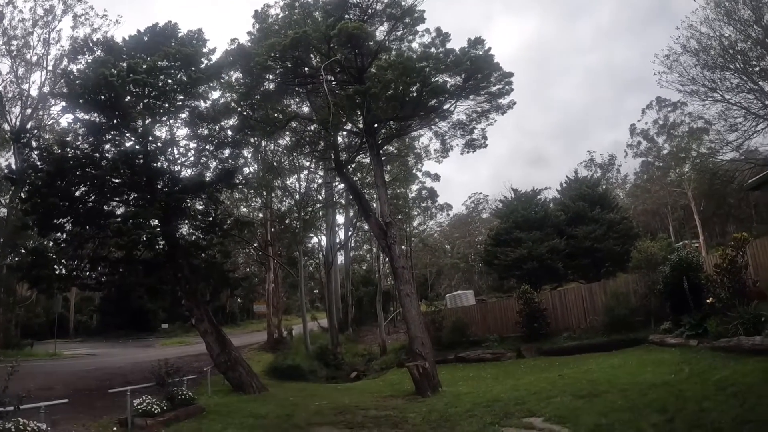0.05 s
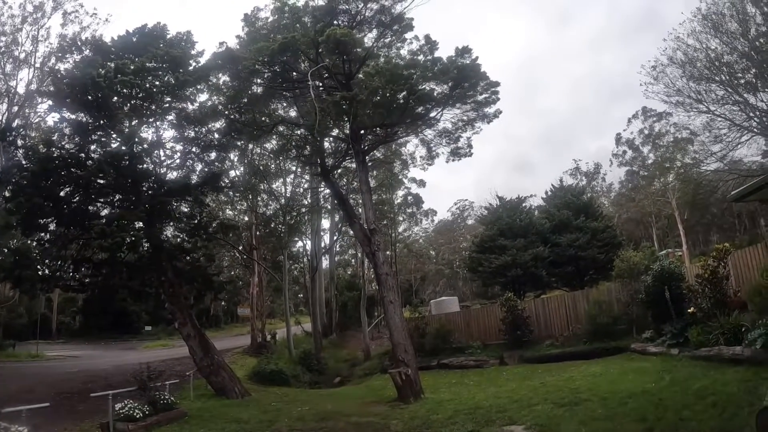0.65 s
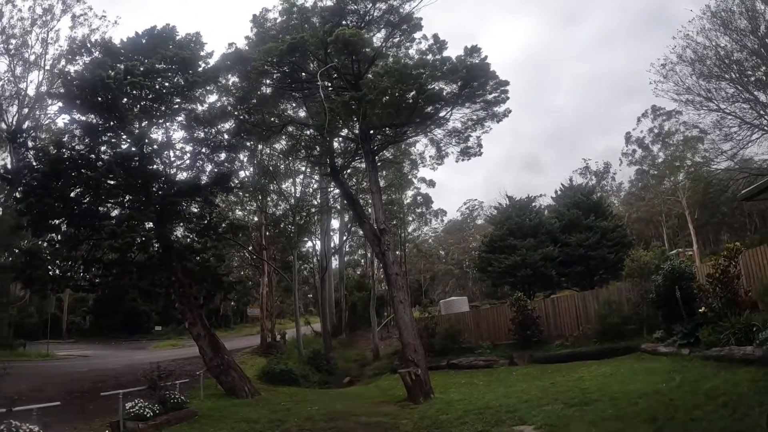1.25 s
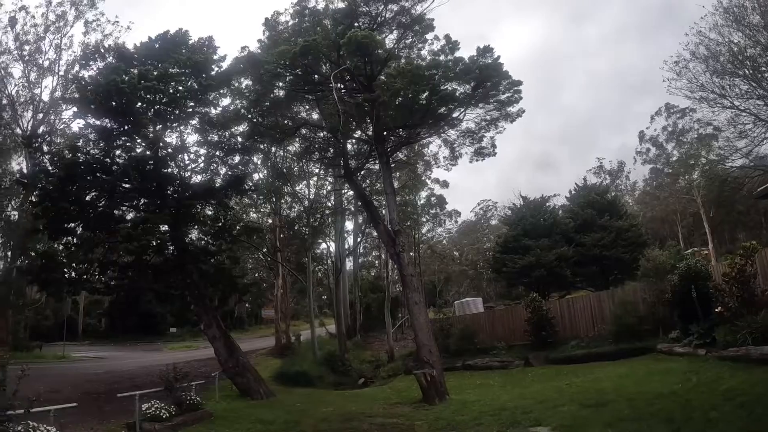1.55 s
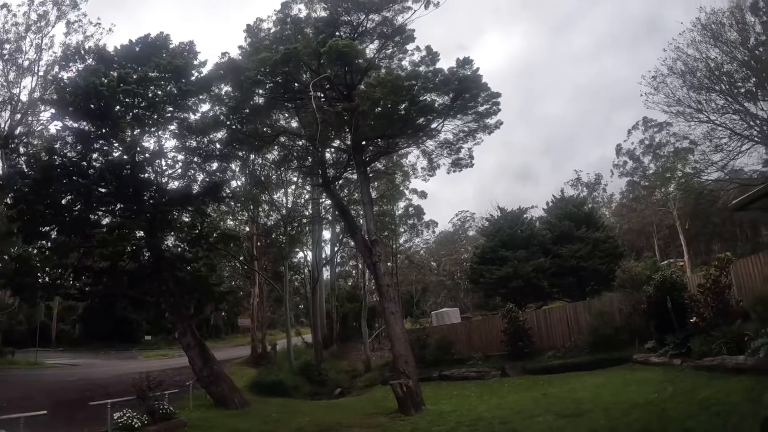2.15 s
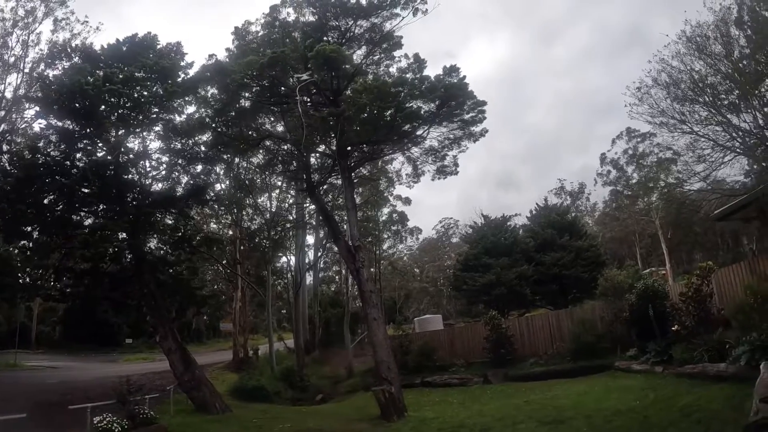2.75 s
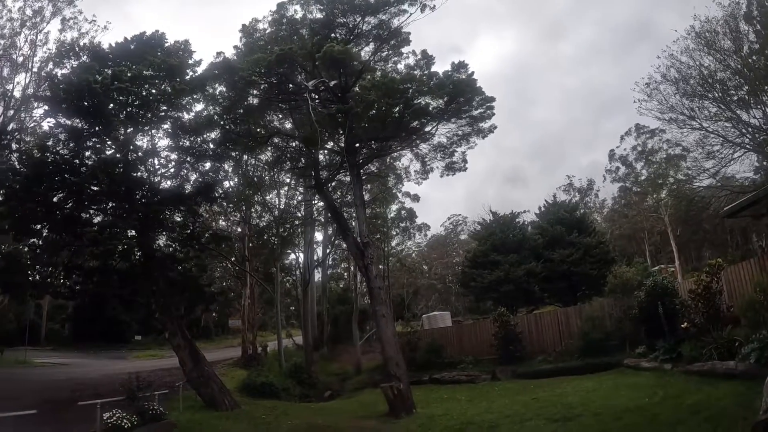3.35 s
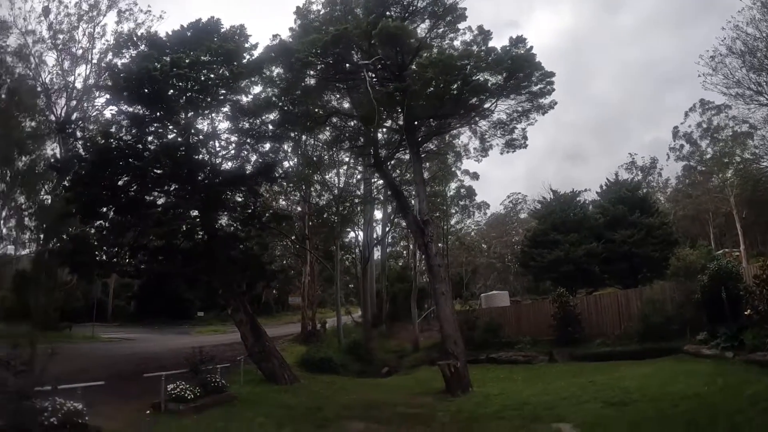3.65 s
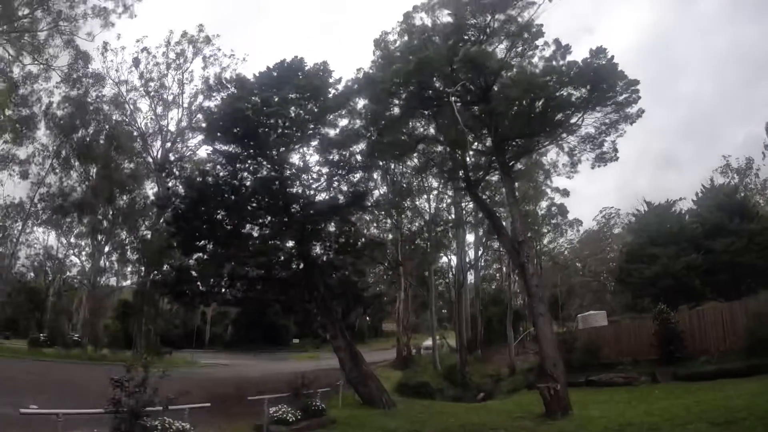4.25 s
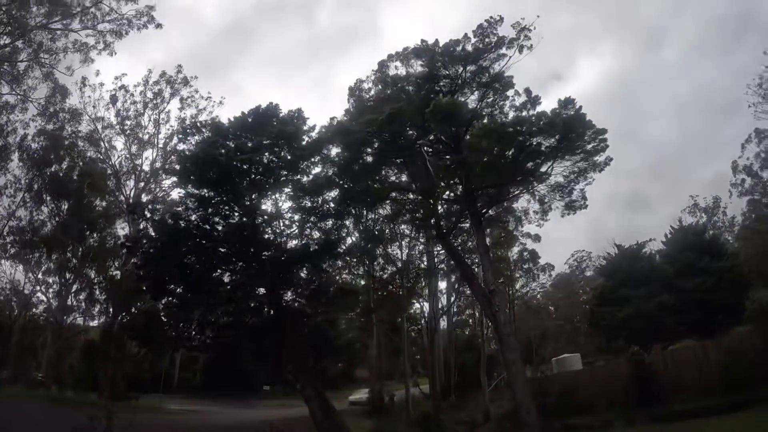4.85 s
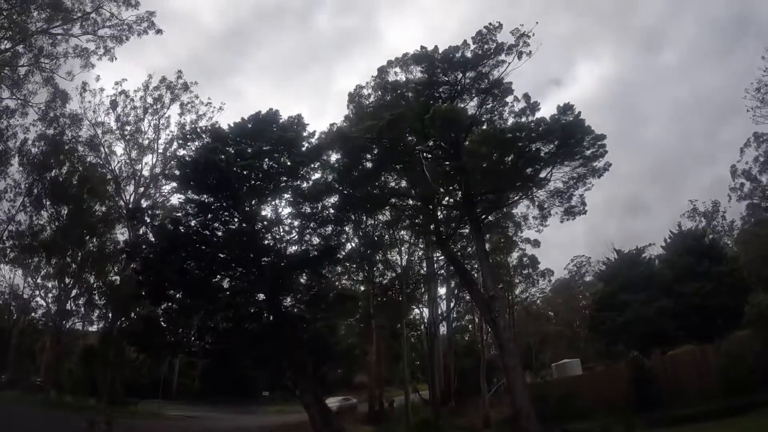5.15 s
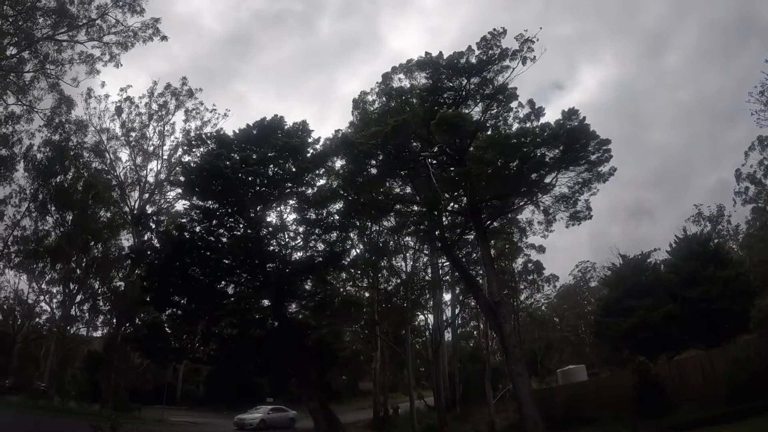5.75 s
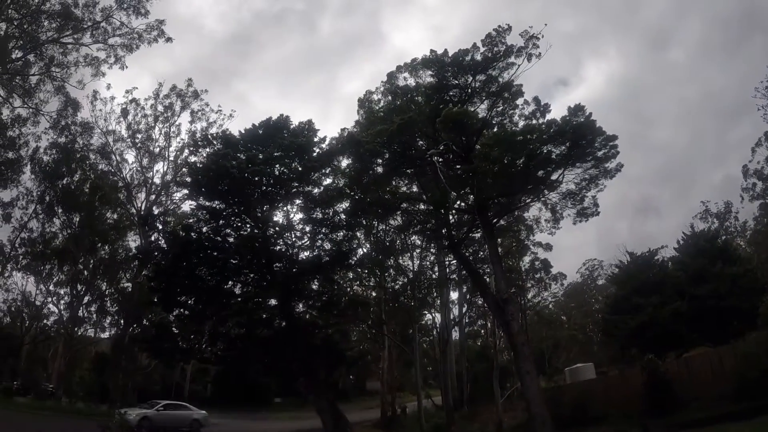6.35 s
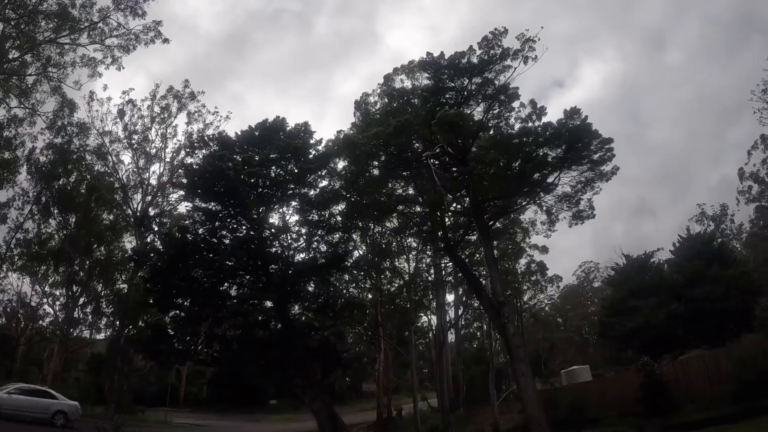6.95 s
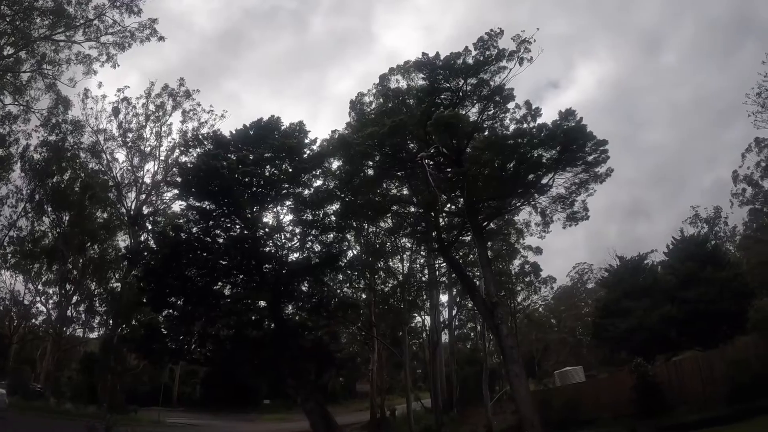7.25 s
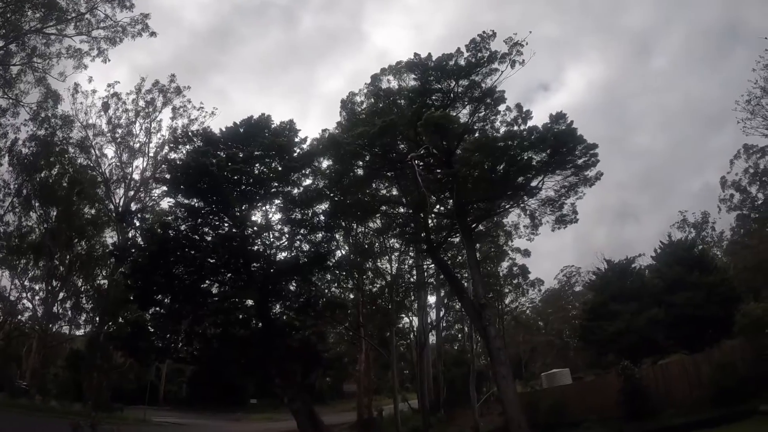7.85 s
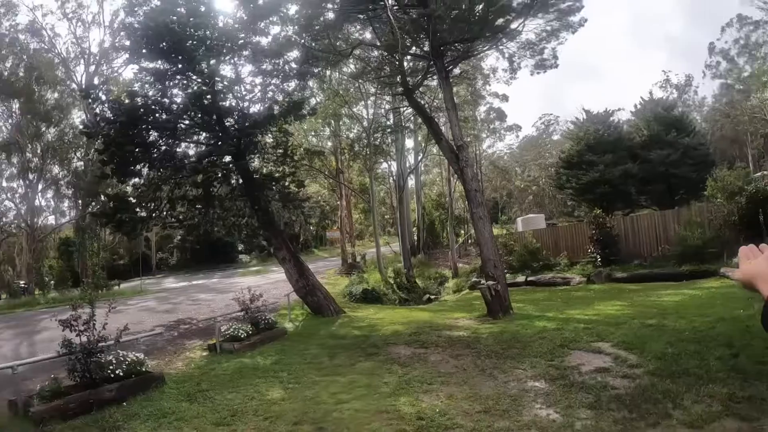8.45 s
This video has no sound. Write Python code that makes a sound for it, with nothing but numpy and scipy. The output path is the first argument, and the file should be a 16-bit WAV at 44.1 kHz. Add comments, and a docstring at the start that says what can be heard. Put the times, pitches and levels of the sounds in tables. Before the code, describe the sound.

Large birds, probably cockatoos, call among tall garden trees: three loud, high wailing whistles at about 0, 1.1 and 2 seconds, each lasting under a second, partly rasping and ending in a sharp downward flick. A smaller bird adds thin, tumbling whistles in pairs near 2.3 and 6 seconds. Distant birds give hoarse notes around 3 seconds, a descending warble at 4.4 and fluting notes afterwards. A far crow caws at 5.4, 6.3 and 7.3 seconds, and a softer, raspier wail comes at 6.1. Underneath, a low hum repeatedly swells in steady outdoor air. A slow car rumbles from about 3.9 seconds, its engine strongest near 6.8. A brief low buffet hits the microphone at 7.4. Quick scratchy chirps run from 7.8 to 8.5. Everything dips out momentarily at 3.8 and 7.6 seconds, and the background returns with a different tone.

```python
"""Long wailing whistles break into a rasp and end in a downward flick: large birds, probably cockatoos,
among tall garden trees. A vibrating membrane makes each tone and a slower one modulates it into a rasp.
A smaller bird adds high stepped whistles; far birds flute, warble and caw, and at last a small bird
chirps. Trunks scatter every call. Beneath them a low hum swells and a car rolls by. Twice the whole
sound dips out briefly, and the outdoor air comes back with another colour."""
import sys
import numpy as np
from scipy import signal
from scipy.fft import rfft, irfft, next_fast_len
from scipy.io import wavfile
from scipy.ndimage import uniform_filter1d

SR = 44100
rng = np.random.default_rng(int(sys.argv[2]) if len(sys.argv) > 2 else 0)


def persist_wave(psi):
    """Save psi, clipped to +-1, as 16-bit WAV."""
    counts = np.round(np.clip(psi, -1, 1) * 32767).astype(np.int16)
    wavfile.write(sys.argv[1], SR, np.atleast_2d(counts).T)


N = 374409


def wails(flutter_depth=0.76, rush_db=-1.5, flick_clear_s=.015, slap_s=.048, slap_db=-16):
    """Amplitude modulation: a slow membrane shakes a whistling one into sidebands as air rushes past."""
    # One course per wail, up to its flick. Each row: time in seconds, membrane pitch in Hz,
    # level in dB, rasp from 0 to 1, flutter rate in Hz.
    courses = [
        [(-.05, 2380, -23, 0.97, 1130), (.07, 2320, -30.5, 1, 1134), (.13, 2225, -31, 0.95, 1150),
         (.19, 2195, -25.5, 0.62, 1153), (.45, 2150, -26.5, .65, 1201), (.52, 2100, -24.5, 0.13, 1406),
         (.578, 2083, -22.5, 0.2, 1504), (.598, 2086, -17, 0.19, 1535), (.69, 2114, -25, 0.56, 1595),
         (.809, 2088, -24, 0.66, 1802)],
        [(1.06, 1990, -46, .8, 957), (1.085, 2067, -31.5, 0.75, 1000), (1.11, 2170, -27.5, 0.65, 1075),
         (1.16, 2298, -26.5, 0.3, 1064), (1.23, 2376, -24, 0, 1070), (1.42, 2366, -20.5, 0, 1090),
         (1.55, 2306, -22, 0, 1090), (1.63, 2275, -20.5, 0, 1087), (1.675, 2215, -24, 0, 1070),
         (1.69, 2170, -19, 0.05, 1102), (1.735, 2100, -21, 0, 1090), (1.756, 2080, -24, 0.3, 1080)],
        [(2.04, 1880, -50, 0.7, 953), (2.075, 2050, -37.5, 0.86, 1000), (2.105, 2265, -34.5, 0.9, 1152),
         (2.145, 2570, -31.5, 0.6, 1100), (2.19, 2765, -27, 0.28, 1100), (2.28, 2710, -23, 0.05, 1110),
         (2.40, 2637, -21.5, 0.15, 1100), (2.48, 2544, -27, 0.06, 1086), (2.58, 2391, -20.5, 0.1, 1110),
         (2.68, 2354, -23.5, 0.03, 1100), (2.726, 2253, -24, 0.33, 1110)],
        [(6.115, 1966, -38, .7, 892), (6.17, 2035, -33, .7, 900), (6.235, 2148, -29.5, 0.6, 920),
         (6.31, 2200, -35, 0.8, 937), (6.45, 2320, -33, .55, 947), (6.53, 2400, -34, .7, 1046),
         (6.68, 2306, -32, 0.81, 1010), (6.792, 2248, -33.5, .95, 1047)],
    ]
    # The second voice of each wail. Each row: time in seconds, pitch in Hz, level in dB.
    undertones = [
        [(-.05, 2340, -44), (.18, 2220, -42), (.34, 2190, -37.5), (.45, 2110, -40.5), (.54, 2060, -36.5),
         (.63, 2110, -40.5), (.72, 2140, -37), (.82, 2090, -44)],
        [(1.02, 2000, -45), (1.09, 2080, -39), (1.13, 2350, -43), (1.19, 2690, -44), (1.3, 2490, -29.5),
         (1.42, 2390, -34.5), (1.48, 2390, -44), (1.59, 2330, -42), (1.69, 2170, -42), (1.77, 2030, -39)],
        [(2.04, 1800, -43), (2.08, 2100, -39), (2.105, 2300, -43), (2.13, 2620, -41), (2.19, 2680, -47),
         (2.25, 2690, -51), (2.33, 2660, -32), (2.39, 2640, -50), (2.43, 2610, -60), (2.48, 2540, -39),
         (2.56, 2410, -36), (2.67, 2380, -40.5), (2.74, 2170, -40)],
        [(6.42, 2350, -50), (6.62, 2330, -52), (6.81, 2170, -49)],
    ]
    # The timbre of each wail. Each row: pitch jitter and flutter jitter as fractions, harmonics 3 and 4
    # in dB against the second, flick level in dB, reverberation in dB against the direct sound.
    voices = [(0.01125, .1, -29, -16, -17, 0.31), (0.01306, 0.044, -18.5, -29.5, -15.5, -1),
              (0.012, .05, -23, -51, -14.5, 0.74), (0.0284, 0.174, -5.5, -29, -20.5, 2.1)]
    out = np.zeros((2, N))
    for course, under, timbre in zip(courses, undertones, voices):
        jitter, flutter_jitter, third_db, fourth_db, flick_db, wet_db = timbre
        start, on, hz, db, rasp, flutter_hz = wail_gesture(course, flick_db)
        n = len(hz)
        quaver = wander(120, n) * (hz / hz.max()) ** 3  # dies away as the membrane slackens
        phase = turn(hz * (1 + jitter * quaver + 0.0198 * rasp * wander(556, n)))
        since_flick = start + np.arange(n) / SR - course[-1][0]
        held = np.clip(1 - since_flick / flick_clear_s, 0, 1)  # overtones and flutter end in the flick
        overtones = undb(third_db) * np.sin(3 * phase) + undb(fourth_db) * np.sin(4 * phase)
        # the call sounds an octave above the membrane's pitch
        tone = np.sin(2 * phase) + (1 - 0.69 * rasp) * held * overtones
        flutter = held * np.sin(turn(flutter_hz * (1 + flutter_jitter * wander(263, n))))
        voice = np.sqrt(2) * tone * (1 + rasp * flutter_depth * flutter)
        voice += rasp * undb(rush_db) * breath(n)
        track = np.zeros(N)
        add(track, start, voice * on * undb(db))
        add(track, start + slap_s, voice * on * undb(db + slap_db))  # one echo, perhaps off a fence
        add(track, *undertone(under))
        out += trees(track, wet_db=wet_db, t60=0.87, pan_db=-0.2, lag_s=-.0018)
    return out


def wail_gesture(course, flick_db, throb_hz=13.76, throb_db=2.0, waver=0.00302, flick_rasp=.6):
    """Slow random modulation makes a held note throb; an accented downward glide ends it."""
    # The closing flick. Each row: time after the held note in seconds, fraction of its last pitch,
    # level in dB against the flick level.
    flick_shape = [(.011, 1, -7), (.018, .92, 1.5), (.024, .85, -0.5), (.032, .7, -9.5), (.04, .54, -15.5),
                   (.049, .39, -19.5), (.059, 0.28, -39.5)]
    end, last_hz, _, last_rasp, last_flutter = course[-1]
    flick = [(end + s, last_hz * share, flick_db + db, last_rasp * share * flick_rasp, last_flutter)
             for s, share, db in flick_shape]
    start, on, hz, db, rasp, flutter_hz = controls(list(course) + flick)
    n = len(hz)
    held = start + np.arange(n) / SR < end
    hz = hz * (1 + waver * wander(throb_hz, n))
    db = db + throb_db * wander(throb_hz, n) * held
    return start, on, hz, db, np.clip(rasp, 0, 1), flutter_hz


def breath(size):
    """Turbulence: air forced past the membrane adds broadband noise to the rasp."""
    # The spectrum of the rush. Each row: frequency in Hz, relative level in dB.
    rush_colour = [(1500, -29), (2400, -5), (3400, -7.5), (4600, 0.5), (5800, -1.5), (7000, -9),
                   (9500, -18), (15000, -19.5)]
    return noise(rush_colour, size)


def undertone(course, jitter=.012, waver=.006, break_db=3.0):
    """Biphonation: a thin second voice glides about an octave under a wail, wavering and breaking."""
    start, on, hz, db = controls(course)
    n = len(hz)
    phase = turn(hz * (1 + jitter * wander(150, n) + waver * wander(18, n)))
    dips_db = break_db * np.abs(wander(16, n))
    return start, np.sqrt(2) * np.sin(phase) * on * undb(db - dips_db)


def whistles(steady=0.0124, unsteady=0.13):
    """Random frequency modulation roughens a thin whistle more and more as its pitch drops."""
    # High whistles. Each row: start in seconds, length of the arch in seconds, top pitch in Hz,
    # lowest step in Hz, level in dB, loss in dB per unit of fractional pitch drop.
    calls = [(2.261, 0.055, 8090, 6700, -23, 0), (2.472, 0.054, 7920, 6750, -22, 6),
             (5.914, .052, 8176, 5000, -22, -1), (6.127, 0.049, 7980, 5000, -22, 3)]
    track = np.zeros(N)
    for start, arch_s, top_hz, lowest_hz, db, fade_db in calls:
        hz, gain = whistle_gesture(arch_s, top_hz, lowest_hz, db)
        drop = 1 - hz / hz.max()
        jitter = steady + unsteady * drop
        tone = np.sqrt(2) * np.sin(turn(hz * (1 + jitter * wander(165, len(hz)))))
        add(track, start, tone * gain * undb(-fade_db * drop))
    return trees(track, wet_db=2, t60=.75, pan_db=-6, lag_s=.00063)


def whistle_gesture(arch_s, top_hz, lowest_hz, db, scoop=0.12, step_s=.0175, rise_hz_per_s=15300):
    """Frequency jumps: the pitch arches to its top, then tumbles in steps that each creep upward."""
    # The descent, with one rebound. Each row: fraction of the top pitch, level in dB against the arch.
    steps = [(0.93, 1.5), (.875, 2.5), (.665, -5), (.8, -2.5), (.62, -12)]
    attack_s, slur_s, release_s = 0.016, 0.0054, 0.0065
    u = np.linspace(0, 1, int(arch_s * SR))
    t = np.arange(0, step_s, 1 / SR)
    pitches = [top_hz * (1 - scoop * (1 - u) ** 2)]
    gains = [np.minimum(u * arch_s / attack_s, 1)]
    for share, step_db in steps:
        pitches.append(max(top_hz * share, lowest_hz) + rise_hz_per_s * (t - step_s / 2))
        gains.append(np.full(len(t), undb(step_db)))
    hz, gain = uniform_filter1d([np.concatenate(pitches), np.concatenate(gains)], int(slur_s * SR))
    release = np.minimum(np.arange(len(hz))[::-1] / SR / release_s, 1)
    return hz, gain * undb(db) * release


def far_calls_and_side_tones():
    """Reverberation outweighs direct sound in far notes, a crow's caws and two side tones of the wails."""
    # The rows at 1.075 s and 2.055 s are short rising side tones at the raspy start of the second and
    # third wails; the rest are far birds' fluted or hoarse notes. Each row: start and length in seconds,
    # first, middle and last pitch in Hz, level in dB, rasp from 0 to 1.
    notes = [ (0.954, 0.14, 1960, 2013, 2020, -41.5, 0.12), (1.075, .05, 2990, 3130, 3250, -37, .1),
             (2.055, .05, 2980, 3150, 3350, -37.5, .1), (2.92, 0.38, 5700, 6190, 5680, -48, 1),
             (2.927, 0.19, 3926, 4186, 4010, -36, 0.93), (3.164, 0.14, 4070, 4310, 4000, -36.5, 0.8),
             (3.997, 0.1, 1996, 2040, 1990, -41.5, 0.25), (4.0, 0.07, 2250, 2500, 2250, -43, 0.94),
             (4.907, .1, 2747, 2565, 2590, -40.5, 0.2), (5.032, 0.2, 2567, 2530, 2420, -42.5, 0.2),
             (4.984, 0.15, 2250, 2135, 2100, -43, 0.57), (5.389, 0.12, 3360, 3280, 3290, -52, 0.18),
             (5.56, 0.102, 2035, 2110, 2030, -39, 0.23), (5.936, .075, 2328, 3210, 3270, -36.5, 0.27),
             (6.006, 0.091, 3250, 2390, 1960, -37.5, 0.25), (6.221, 0.096, 2800, 3085, 3050, -38.5, 0.18),
             (6.282, 0.094, 3520, 3590, 3490, -36, 0.07), (6.39, 0.042, 3400, 2800, 2511, -39, .2),
             (6.5, .26, 3600, 3640, 3560, -40, 0.17), (7.047, 0.56, 6302, 6730, 6460, -46, 1)]
    # The crow's calls. Each row: start and length in seconds, middle pitch in Hz, level in dB.
    caws = [(5.414, 0.26, 260.5, -38), (6.312, 0.226, 256.7, -36.5), (7.274, .24, 256.8, -36)]
    track = np.zeros(N)
    for start, length, first, middle, last, db, rasp in notes:
        hz, swell = arch(length, first, middle, last)
        bend = 1 + 0.01194 * wander(35.2, len(hz)) + .15 * rasp * wander(508, len(hz))
        add(track, start, unit(np.sin(turn(hz * bend)) * swell) * undb(db))
    for start, length, pitch, db in caws:
        add(track, start, caw(length, pitch) * undb(db))
    return trees(track, wet_db=6, t60=.95, pan_db=-5, lag_s=.001)


def caw(length, pitch, throat_hz=1550, width_hz=200):
    """Source and filter: the resonance of a crow's throat picks a few harmonics out of a rough buzz."""
    hz, swell = arch(length, .92 * pitch, pitch, .96 * pitch)
    phase = turn(hz * (1 + 0.0472 * wander(168, len(hz))))
    voice = sum(np.sin(k * phase) / (1 + ((k * hz - throat_hz) / width_hz) ** 2) for k in range(3, 11))
    return unit(voice * swell)


def warble(jitter=0.029):
    """Short falling frequency glides in quick succession are heard as one descending warble."""
    # A far bird's run. Each row: start and length in seconds, first, middle and last pitch in Hz,
    # level in dB.
    notes = [(4.363, 0.028, 3560, 3520, 3400, -48), (4.414, 0.022, 3600, 3450, 3250, -50),
             (4.443, 0.019, 3540, 3070, 2180, -40.5), (4.48, 0.026, 3330, 3270, 3130, -43),
             (4.53, .028, 3320, 3175, 3050, -42), (4.58, 0.045, 3270, 3080, 3030, -45.5),
             (4.633, 0.033, 3170, 2870, 2640, -46)]
    track = np.zeros(N)
    for start, length, first, middle, last, db in notes:
        hz, swell = arch(length, first, middle, last)
        tone = np.sin(turn(hz * (1 + jitter * wander(200, len(hz)))))
        add(track, start, unit(tone * swell) * undb(db))
    return trees(track, wet_db=-1.0, t60=0.67, pan_db=-9.0, lag_s=.0001)


def chirps(jitter=0.08, scratch_db=3):
    """Fast random modulation of pitch and level spreads a small bird's sweeps into scratchy bands."""
    # Quick sweeps. Each row: start and length in seconds, first, middle and last pitch in Hz,
    # level in dB, scratchiness from 0 to 1.
    sweeps = [ (7.81, .03, 4600, 4766, 4600, -44, .8), (7.866, 0.021, 4240, 4350, 4600, -38.5, .3),
              (7.99, 0.033, 4480, 4720, 5300, -38.5, .6), (8.02, 0.036, 5340, 4950, 4800, -38, .9),
              (8.058, 0.043, 4280, 4170, 4400, -41.5, 0.96), (8.198, 0.032, 5240, 4650, 4200, -38.5, .6),
              (8.223, 0.028, 3500, 3950, 3500, -37.5, .8), (8.282, 0.035, 3900, 4260, 4100, -39, .9),
              (8.361, 0.037, 4600, 6020, 6600, -39, 0.9), (8.379, 0.027, 5290, 4510, 3950, -30.5, 0.5),
              (8.439, 0.0148, 3580, 4200, 4900, -28.5, 0.4), (8.445, 0.014, 5000, 5200, 4800, -35.5, 0.9)]
    track = np.zeros(N)
    for start, length, first, middle, last, db, scratch in sweeps:
        hz, swell = arch(length, first, middle, last)
        tone = np.sin(turn(hz * (1 + jitter * scratch * wander(590, len(hz)))))
        flicker = undb(scratch_db * scratch * wander(200, len(hz)))
        add(track, start, unit(tone * swell ** 3 * flicker) * undb(db))
    return trees(track, wet_db=-2.5, t60=.3, pan_db=4, lag_s=-.00005)


def trees(x, wet_db, t60, pan_db, lag_s):
    """Scattering: close echoes off trunks and the wood's long tail follow the direct sound in stereo."""
    t = np.arange(SR) / SR
    trunks = rng.standard_normal((2, SR)) * (rng.random((2, SR)) < .02) * np.exp(-t / 0.027)
    tail = rng.standard_normal((2, SR)) * undb(-60 * t / t60) * (1 - np.exp(-t / 0.0038))
    tail = signal.sosfilt(signal.butter(1, 6000, fs=SR, output="sos"), tail)  # leaves absorb treble
    echoes = unit(unit(trunks) + undb(-1.5) * unit(tail)) * undb(wet_db) / np.sqrt(SR)
    echoes *= 1 - np.exp(-(t / .009) ** 2)  # reflections take time to build up
    direct = np.array([np.roll(x, int(lag_s * SR)) * undb(pan_db / 2), x * undb(-pan_db / 2)])
    scattered = signal.fftconvolve(x[None], echoes, axes=1)[:, :N]
    return (direct + scattered) / np.hypot(1, undb(wet_db))


def hum(fade_db=11, attack=0.23, release=0.34):
    """Slow amplitude envelopes make a low hum swell, hold and fade, again and again."""
    # Swells of the hum. Each row: start and length in seconds, pitch in Hz, relative level in dB,
    # delay at the left microphone in seconds.
    swells = [(.18, 0.52, 171.3, -40, -0.0064), (1.05, 0.68, 168.8, -44, -0.015),
              (1.63, 0.4, 259.5, -44.5, 0), (1.76, 0.45, 169, -40, -0.0046),
              (2.24, 0.45, 169.4, -38, 0.0023), (2.56, 0.38, 258.7, -47, 0),
              (2.63, 0.42, 168, -37.5, -0.0019), (3.06, 0.36, 170.2, -37, -0.0005),
              (3.68, 0.29, 168.8, -38.5, -0.0037), (3.83, 0.32, 183.5, -41, 0.0077),
              (4.0, 1.05, 181.5, -34.5, -0.0039), (5.25, 0.81, 178.8, -36, 0.001),
              (6.02, 0.32, 180.2, -38.5, -0.0032), (6.44, 0.5, 180, -41, 0.0058),
              (6.78, 1.06, 178.7, -35.5, -0.0011)]
    envelope = [(0, fade_db), (attack, 0), (1 - release, 0), (1, fade_db)]
    out = np.zeros((2, N))
    for start, length, hz, db, lag_s in swells:
        course = [(start + share * length, hz, db - fade) for share, fade in envelope]
        out += drone(course, gain_db=1.5, waver=0.0048, blur=0.46, lag_s=lag_s)
    return out


def car(rumble_lag_s=0.0032):
    """Periodic firing gives a slow car's engine its note, over the low noise of the road."""
    # The engine. Each row: time in seconds, firing rate in Hz, relative level in dB.
    engine_course = [(2.3, 84, -65), (2.8, 82, -46.5), (3.8, 84, -55), (3.87, 90, -37), (4.52, 81.8, -38),
                     (4.84, 91, -40.5), (5.3, 78.2, -43), (5.6, 90.1, -36), (6.83, 88.8, -31),
                     (7.5, 78.7, -40), (7.57, 80, -45)]
    # The road's rumble. Each row: time in seconds, level in dB.
    rumble_course = [(2.3, -70), (2.7, -68), (3.8, -68), (3.87, -35.5), (4.6, -34), (5.3, -38.5),
                     (5.9, -41), (7.6, -48)]
    # Its spectrum. Each row: frequency in Hz, relative level in dB.
    rumble_colour = [(25, -50), (42, -15), (54, -2), (75, 3), (110, -17), (300, -45), (2000, -100)]
    start, on, db = controls(rumble_course)
    rumble = np.zeros(N)
    add(rumble, start, noise(rumble_colour, len(db)) * on * undb(db))
    engine = drone(engine_course, gain_db=1.0, waver=0.016, blur=0.37, lag_s=0.0015)
    return engine + np.array([rumble, np.roll(rumble, int(rumble_lag_s * SR))])


def drone(course, gain_db, waver, blur, lag_s):
    """Path difference: a low tone reaches one microphone later, blurred differently on each path."""
    start, on, hz, db = controls(course)
    out, n = np.zeros((2, N)), len(hz)
    phase = turn(hz * (1 + waver * wander(7.6, n)))
    for channel, delay in zip(out, (lag_s, 0)):
        tone = np.sin(phase) + blur * wander(7.1, n) * np.cos(phase)
        add(channel, start + delay, tone * on * undb(db + gain_db))
    return out


def buffet(at_s=7.41, width_s=0.049, hz=80, db=-26):
    """A brief, irregular pressure oscillation on the microphones is heard as a low rumble."""
    t = np.arange(N) / SR
    pulse = np.exp(-((t - at_s) / width_s) ** 2)
    return np.sin(turn(hz * (1 + 0.214 * wander(36.99, N)))) * pulse * undb(db)


def air(colour, db, alike=0.12, alike_below_hz=110, flicker_db=0.9):
    """A diffuse field of far traffic, leaves and hiss: only the bass is slightly coherent in stereo."""
    mid, side = noise(colour, N), noise(colour, N)
    side = side - alike * signal.sosfilt(signal.butter(1, alike_below_hz, fs=SR, output="sos"), side)
    return np.array([mid + side, mid - side]) * undb(db + flicker_db * wander(5.5, N))


def noise(colour, size):
    """Spectral shaping: white noise takes the colour of (Hz, dB) points, at rms 1."""
    n = next_fast_len(size)
    hz, db = np.transpose(colour)
    shape = undb(np.interp(np.log(np.fft.rfftfreq(n, 1 / SR) + 1), np.log(hz), db))
    return unit(irfft(rfft(rng.standard_normal(n)) * shape, n)[:size])


def wander(rate_hz, size):
    """Low-passed noise gives a smooth random drift of rms 1, moving at up to about rate_hz."""
    n = next_fast_len(size)
    lowpass = np.exp(-.5 * (np.fft.rfftfreq(n, 1 / SR) / rate_hz) ** 2)
    return unit(irfft(rfft(rng.standard_normal(n)) * lowpass, n)[:size])


def arch(length, first, middle, last):
    """A parabola through three pitches bends a short note under a rounded envelope."""
    u = np.linspace(0, 1, int(length * SR))
    parabola = np.polyfit([0, .5, 1], [first, middle, last], 2)
    return np.polyval(parabola, u), np.sqrt(4 * u * (1 - u))


def controls(rows):
    """Linear interpolation of timed rows: returns the start, a soft gate and one curve per column."""
    times, *columns = np.transpose(rows)
    t = np.arange(times[0], times[-1], 1 / SR)
    return times[0], gate(t, times[0], times[-1], 0.0037), *(np.interp(t, times, c) for c in columns)


def gate(t, start, end, edge):
    """A window with raised-cosine edges switches a sound on and off without clicks."""
    return np.sin(np.pi / 2 * np.clip(np.minimum(t - start, end - t) / edge, 0, 1)) ** 2


def turn(hz):
    """Phase is the running integral of frequency."""
    return 2 * np.pi * np.cumsum(hz) / SR


def add(track, start, x):
    """Superposition: a sound joins the track at a time in seconds."""
    i = int(start * SR)
    x = x[max(-i, 0):N - i]
    track[max(i, 0):max(i, 0) + len(x)] += x


def undb(db):
    """Amplitude grows tenfold for every 20 dB."""
    return 10 ** (np.asarray(db) / 20)


def unit(x):
    """Normalisation to rms 1."""
    return x / np.sqrt(np.mean(x ** 2))


def scene():
    """Birds, low sounds and air superpose in three stretches, parted by brief dips to silence."""
    # The stretches. Each row: start and end in seconds, relative level of the air in dB.
    stretches = [(-.1, 3.835, -35.5), (3.847, 7.595, -34.5), (7.655, 8.6, -34)]
    # One air spectrum per stretch. Each row: frequency in Hz, relative level in dB.
    air_colours = [
        [(25, -52), (48, -42), (75, -9), (130, -3.5), (200, -4), (340, -11), (460, -8), (620, -13), (920, -9.5),
         (1400, -15.5), (2000, -21), (4000, -26.5), (8000, -28), (15500, -23.5)],
        [(15, -52), (25, -22), (96, -2), (193, -10), (240, -11), (331, -15), (469, -12.5), (631, -18),
         (919, -17.5), (1020, -20.5), (1300, -22), (1750, -28), (1950, -30), (6920, -32.5), (15500, -34.5)],
        [(15, -39), (25, -5), (56, -2.5), (91, -4.5), (122, -3.5), (183, -7.5), (289, -7), (410, -9.5),
         (445, -17.5), (614, -11), (945, -10.5), (3930, -21), (4500, -19.5), (6920, -31), (15500, -45)],
    ]
    t = np.arange(N) / SR
    birds = wails() + whistles() + far_calls_and_side_tones() + warble() + chirps()
    sources = birds + hum() + car() + buffet()
    return sum(gate(t, start, end, 0.043) * (sources + air(colour, db - 1.5))
               for (start, end, db), colour in zip(stretches, air_colours))


def record(dry):
    """Band limiting: the recorder's steep low-pass filter cuts the highest treble."""
    top_hz = 15950
    return signal.sosfilt(signal.ellip(10, .2, 80, top_hz, fs=SR, output="sos"), dry)


dry = scene()
out = record(dry)
persist_wave(out)
```